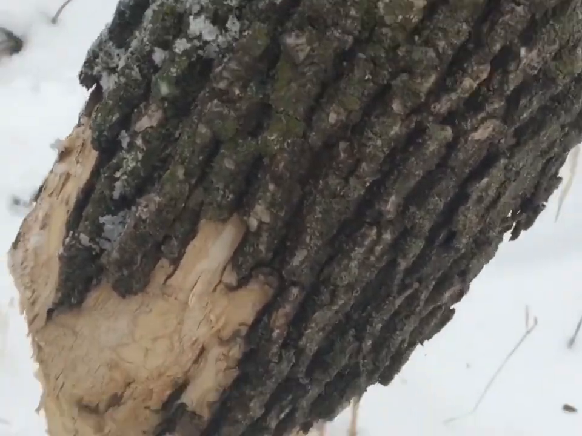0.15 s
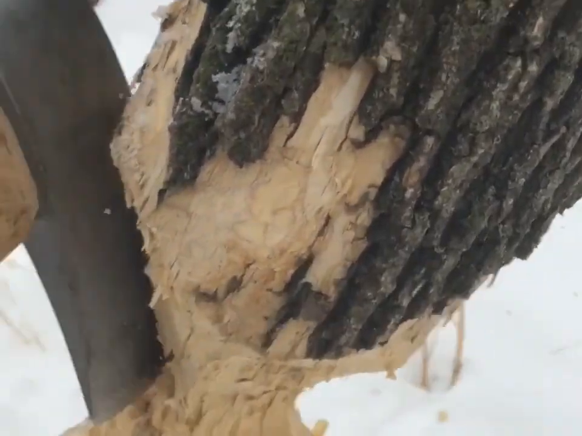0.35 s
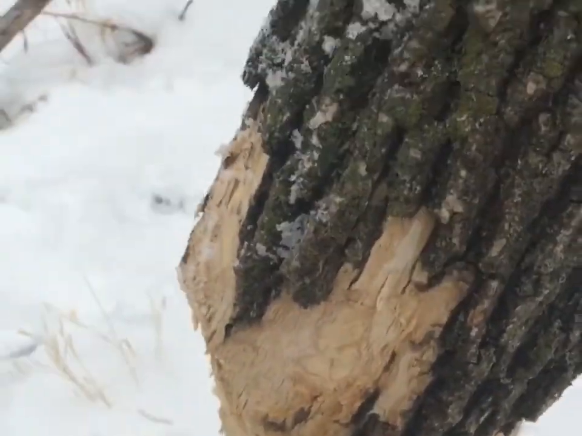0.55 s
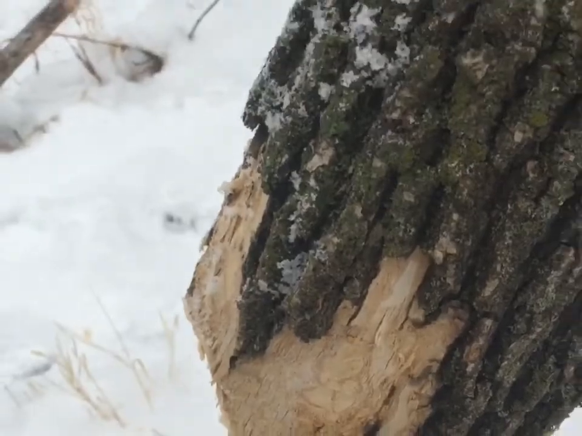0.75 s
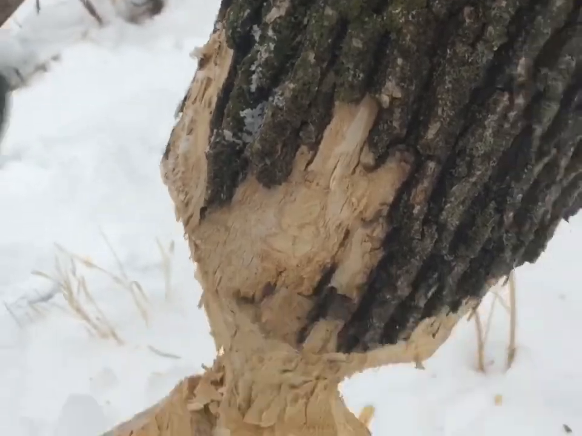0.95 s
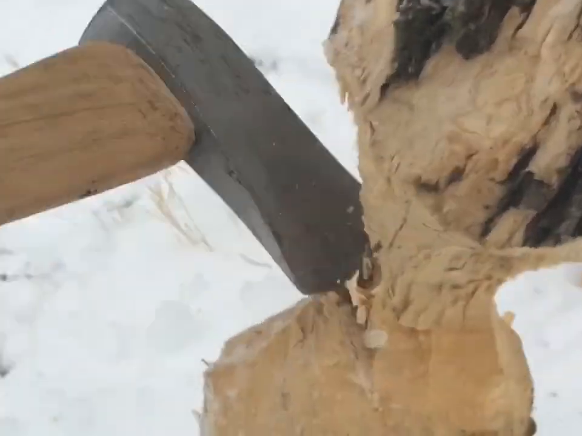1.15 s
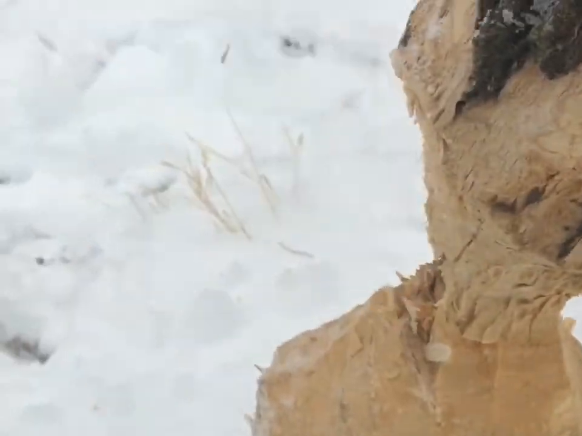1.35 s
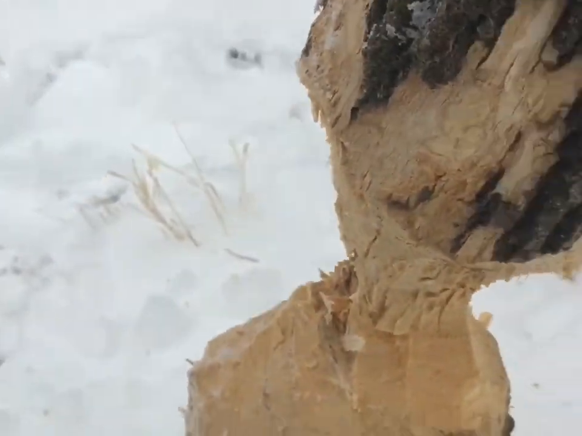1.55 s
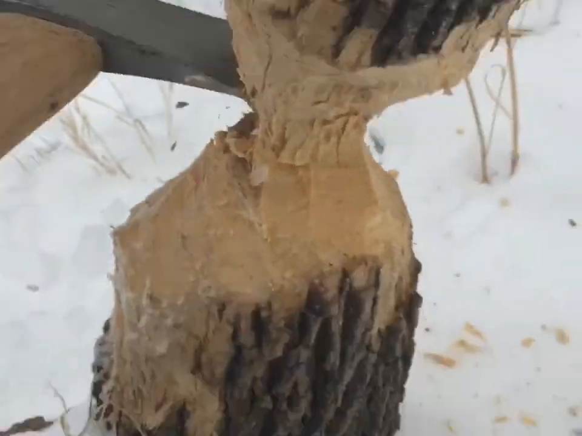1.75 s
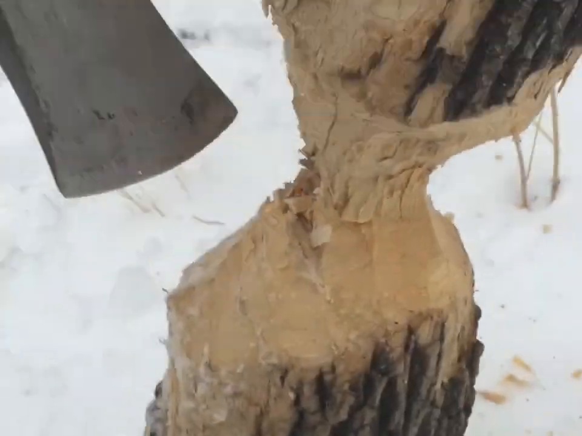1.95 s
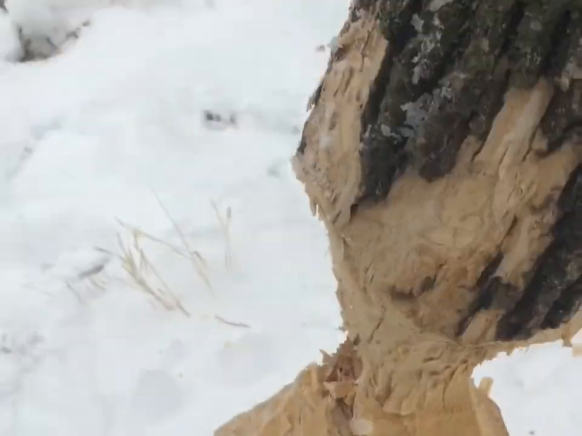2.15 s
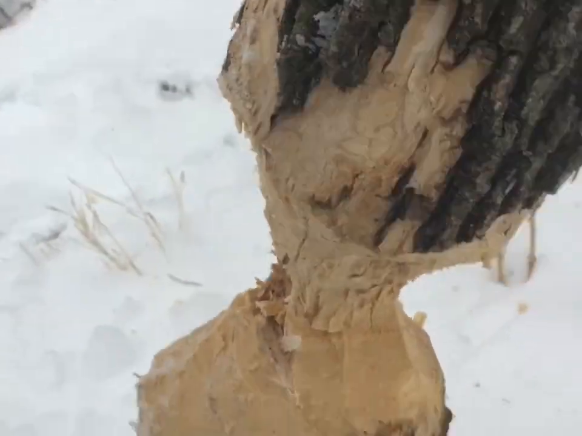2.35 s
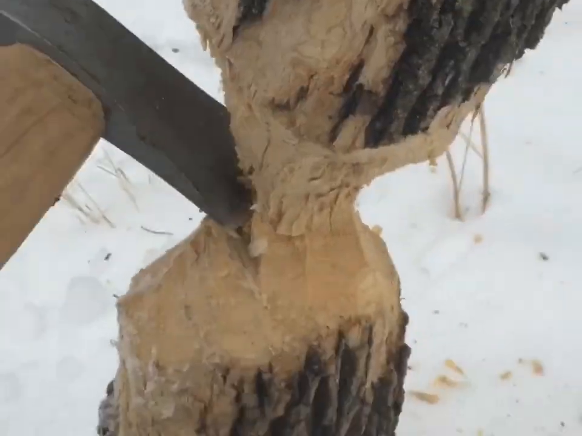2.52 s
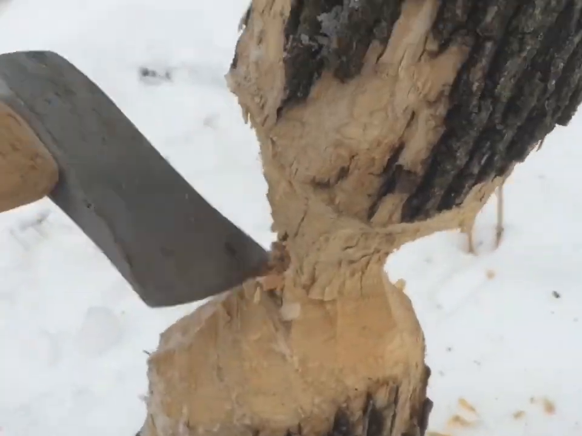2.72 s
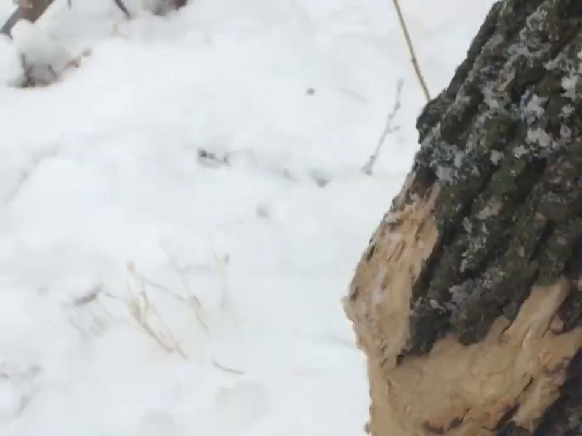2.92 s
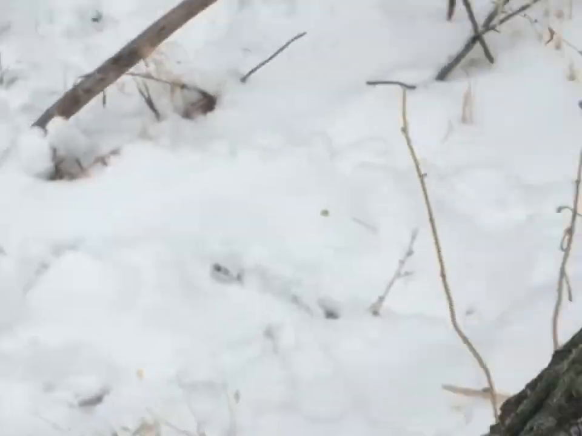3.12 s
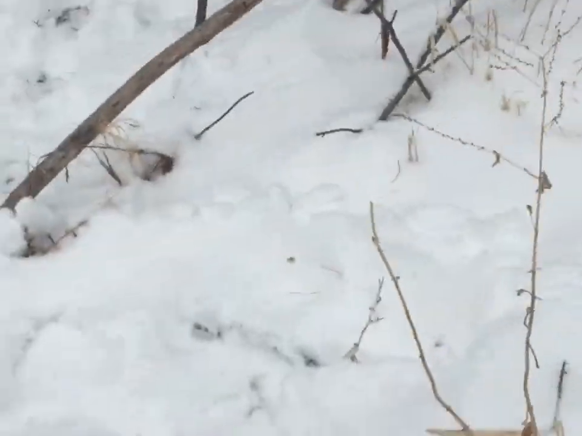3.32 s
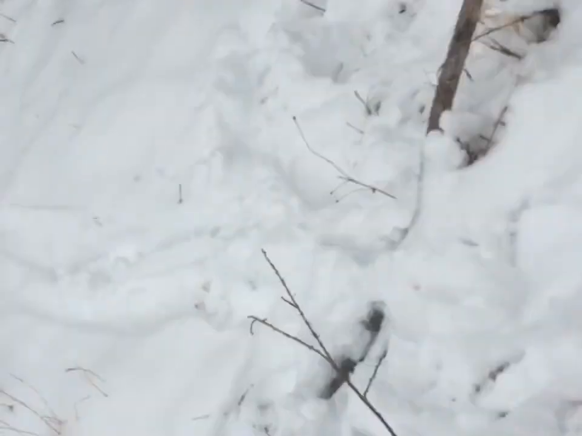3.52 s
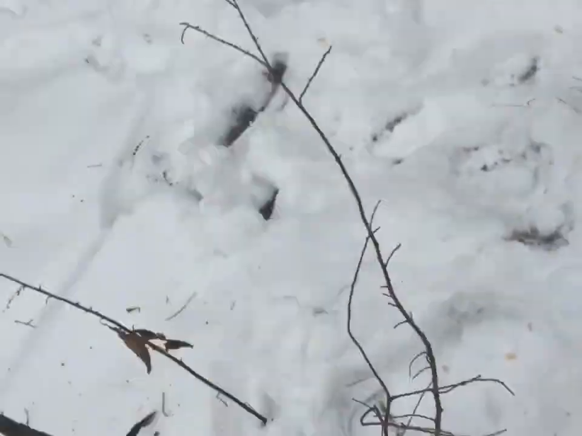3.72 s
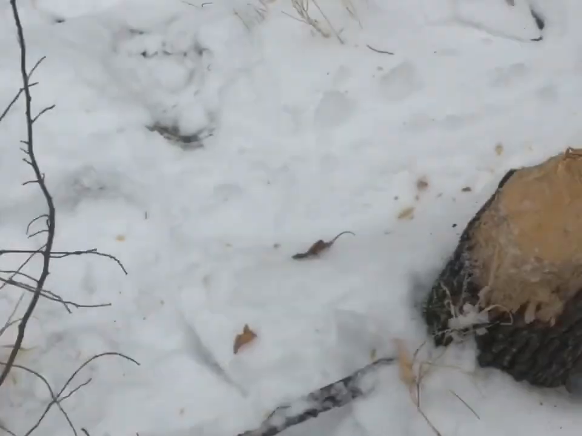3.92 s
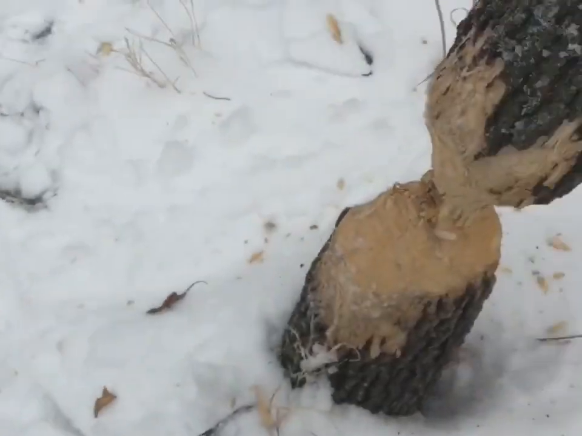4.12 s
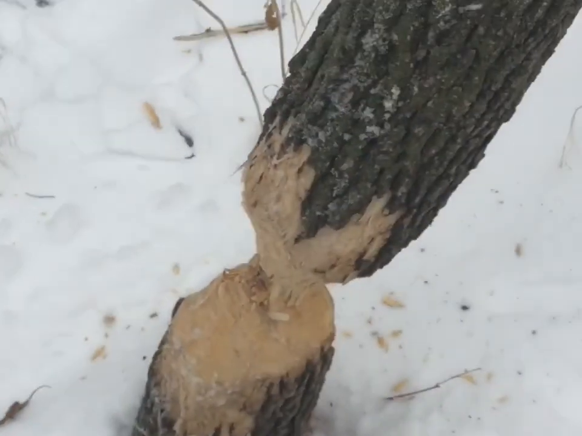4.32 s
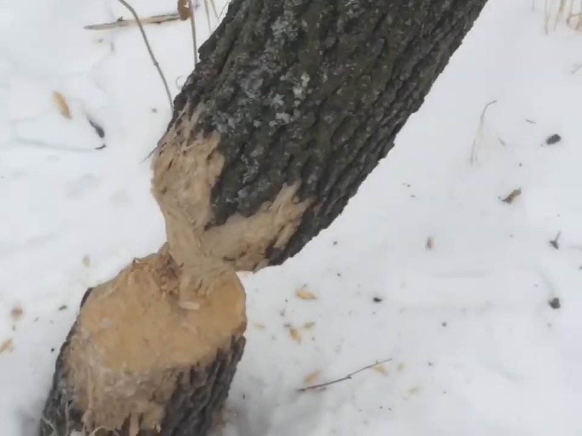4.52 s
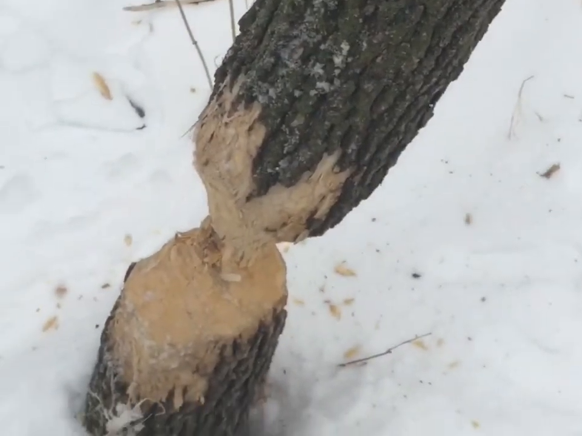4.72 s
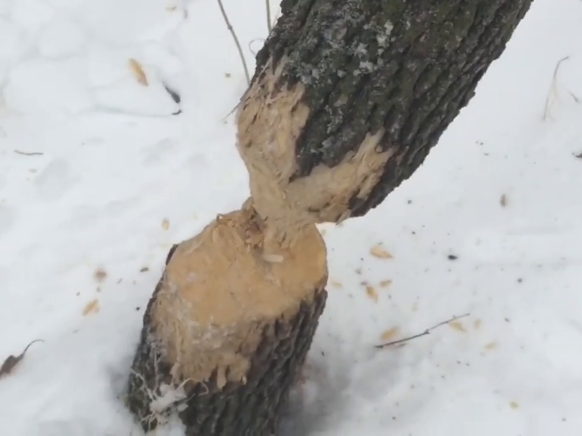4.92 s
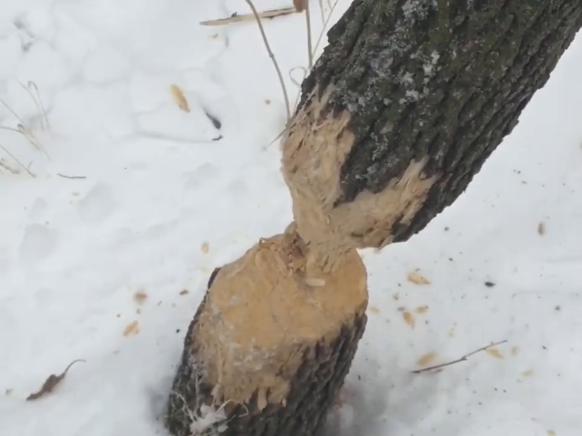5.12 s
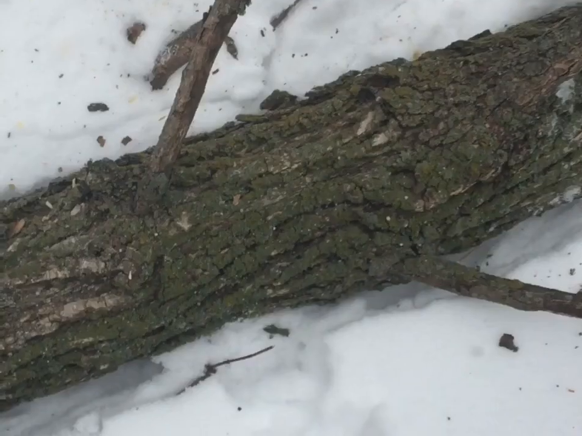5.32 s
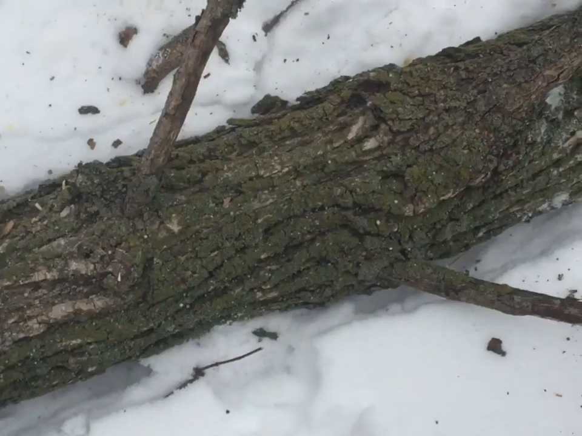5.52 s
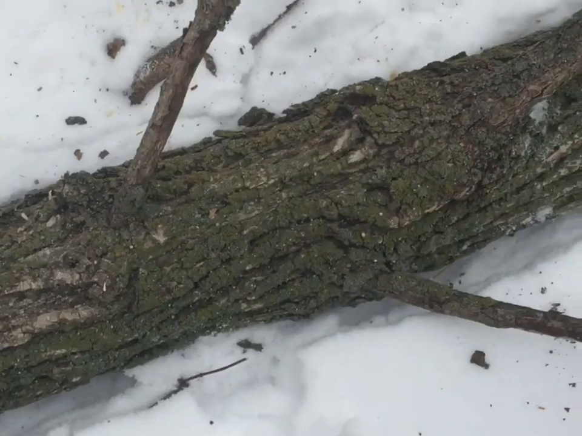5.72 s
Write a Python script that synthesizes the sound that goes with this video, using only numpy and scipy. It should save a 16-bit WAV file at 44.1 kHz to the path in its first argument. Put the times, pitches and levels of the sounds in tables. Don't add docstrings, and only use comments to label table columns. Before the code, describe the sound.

At arm's length, a hatchet hits a notched tree trunk four times, about three quarters of a second apart, each a hard woody crack and short hollow knock that overloads a hand-held phone. The third blow rings with steel. Between them come light blade taps, stiff jacket swishes and ticking chips. Then chopping stops, leaving soft snow crunches, cloth rustle and casing bumps in still, dry winter woods.

```python
import sys
import numpy as np
from scipy import signal
from scipy.fft import rfft, irfft
from scipy.io import wavfile
from scipy.ndimage import uniform_filter1d

SR = 44100
rng = np.random.default_rng(int(sys.argv[2]) if len(sys.argv) > 2 else 0)


def log_audio(samples):
    frames = np.atleast_2d(samples).T
    limited = np.clip(frames, -1, 1)
    pcm = np.round(limited * 32767).astype(np.int16)
    wavfile.write(sys.argv[1], SR, pcm)


def rack_gain(trim_db):
    fader = np.asarray(trim_db, float)
    return 10 ** (fader / 20)


N = 254016

# t/s, fibre crack level/dB, notch knock level/dB, knock f/Hz, steel ring level/dB
BLOWS = [
    (.3195, 0.5, 6, 1121, -39.5),
    (1.0715, 2.5, 3.5, 1050, -37),
    (1.7931, 6.5, 2.5, 777, -8),
    (2.5479, 3, 5, 1023, -42.5),
]
# crack lead before contact/ms, crack length/ms, mid level/dB,
# treble level/dB, knock delay after contact/ms
BITES = [
    (-.1, 1.6, -8, -17, .7),
    (.2, 1.8, -2, -17, 1.5),
    (.1, 1.8, -3, -2, 1.8),
    (.4, 1.9, -6, -17, .6),
]
# f/Hz, t60/s, arrival/ms, first swing (+-1), level/dB at each of the four blows
TRUNK_MODES = [(83, 0.13, 3.2, -1, -9.5, -6, -5.5, -10), (130, 0.031, 2.4, 1, 5, -11, 1.5, 3),
               (136.43, 0.11, 4.1, 1, -12, -2, -9, -9.5), (260, 0.082, 5.4, 1, -10, -2.5, -15, -9.5),
               (311.7, .09, 4.7, 1, -6, -2, -12.5, -7), (445, 0.045, 4.1, 1, -9.5, -4, -23, -13),
               (552, 0.029, 4.0, -1, -15.5, -7, -10, -6.5), (584, .1, 4.7, 1, -21, -18, -17.5, -17.5),
               (725, 0.025, 3.5, 1, -16, -8, -11, -16), (870, 0.025, 3.0, 1, -15, -9, -14, -12)]
# t/s, f/Hz, level/dB, t60/s
SLIVERS = [(.3212, 1850, -9, .025), (.3212, 2280, -8, .012), (.3215, 2800, -8, .015),
           (.3208, 3480, -7, .012), (.3208, 4120, -15, .014), (1.0725, 1680, -17, .02),
           (1.0725, 1990, -22, .02), (1.0725, 4400, -10, .012), (1.0722, 5300, -10, .006),
           (1.0725, 5910, -11, .01), (1.7945, 3550, -4, .014), (1.7943, 3850, -4, .02),
           (1.7945, 4185, -4, .02), (1.7945, 6200, -11, .012), (1.795, 7360, -13, .014),
           (1.795, 8590, -12, .014), (1.7955, 1040, -12, .025), (2.5487, 1400, -9, .016),
           (2.5487, 2290, -11, .016), (2.5485, 3560, -12, .016), (2.5487, 3855, -14, .014),
           (2.5487, 4295, -7, .014), (2.5487, 4700, -9, .012), (2.5487, 6020, -15, .012),
           (2.5487, 7140, -16, .01)]
# f/Hz, t60/s, level/dB
STEEL_MODES = [(3465, .066, -4), (3535, .03, -8), (4460, .028, 1), (4000, .02, -9), (7050, .02, -8),
               (2290, .02, -18), (8225, 0.034, -18.5), (11400, 0.04, -25), (12350, .04, -21)]
# t/s, tick level/dB, steel level/dB, upper steel modes level/dB, wood knock level/dB
REBOUNDS = [(.2975, -49, -56, -4, -28.5), (.3695, -19, -20, -4, -5), (1.193, -45, -62, 12.5, -65),
            (1.2105, -23, -21, 4, -23.5), (1.243, -60, -40, -6, -55), (1.836, -46, -51, 12, -47.5),
            (1.848, -35, -48, 4, -39), (1.864, -40, -51, 10, -47), (1.893, -55, -42, 6.5, -59),
            (2.527, -62, -53, -9, -32), (2.823, -59, -38.5, -4, -56), (2.886, -40, -50, 8, -44)]
# t/s, tick level/dB, wood knock level/dB, knock f/Hz
GRAZES = [(0.283, -53.5, -63.5, 1000), (.309, -53.5, -25, 1000), (.398, -45, -44, 2560),
          (1.014, -57, -33.5, 660), (1.052, -45, -48.5, 896), (1.114, -36.5, -41, 3000),
          (1.746, -60, -43, 924), (2.54, -55.5, -40.5, 900), (2.591, -42, -50.5, 2500),
          (2.722, -62.5, -42.5, 2300), (2.768, -46.5, -36, 590), (2.784, -57, -43.5, 1070),
          (2.896, -58.5, -33.5, 810), (3.354, -44, -25, 850)]
# start t/s, end t/s, level/dB
DRAGS = [(0, 0.02, -50), (0.35, 0.37, -38), (0.408, 0.462, -56), (1.062, 1.074, -52), (1.852, 1.928, -57),
         (1.94, 1.977, -56), (2.673, 2.748, -59), (2.746, 2.85, -54), (2.858, 2.9, -60)]
# t/s, tick peak level/dB, tick f/Hz, snap level/dB
TICKS = [(.207, -58, 1530, -72), (.523, -50, 417, -81.5), (.699, -41.5, 2790, -65.5),
         (.748, -51.5, 1483, -69.5), (1.296, -34, 2582, -58), (1.322, -32, 1840, -49),
         (1.353, -32, 620, -59), (1.385, -38.5, 705, -45), (1.397, -34, 2110, -42), (1.648, -44, 2540, -60),
         (1.977, -43, 422, -56.5), (2.115, -42, 3670, -64), (2.262, -51, 1550, -67.5),
         (2.315, -51.5, 823, -65.5), (2.485, -43, 700, -63), (2.936, -37.5, 390, -60),
         (2.96, -43, 1065, -63), (3.282, -40, 2230, -60.5), (3.429, -42, 408, -49),
         (3.445, -50, 401, -38.5), (3.575, -42, 550, -67), (3.759, -32.5, 540, -52), (3.78, -37, 563, -61),
         (3.813, -38.5, 418.4, -59), (3.865, -35, 423, -51), (3.937, -48, 394.6, -52),
         (4.429, -38, 1480, -66), (4.627, -37.5, 684, -58), (4.988, -37.5, 404, -59),
         (5.343, -45, 416, -75.5)]
# t/s, level/dB, f/Hz
FLICKS = [(1.354, -36, 1100), (1.432, -44, 1300), (1.514, -50, 2300), (1.649, -44, 1500),
          (1.893, -37, 2400), (1.93, -50, 6000), (1.964, -48, 3200), (2.027, -44, 900), (2.074, -44, 3800),
          (2.715, -52, 2300), (2.73, -52, 2300), (2.766, -40, 2500), (2.82, -42, 1800), (2.876, -44, 1000),
          (2.886, -40, 3900), (3.354, -33, 2000), (3.355, -37, 3300), (3.445, -40, 4200), (3.78, -37, 2200),
          (3.787, -45, 1200), (3.866, -42, 1500), (3.912, -43, 1300), (3.94, -42, 1400), (4.9, -54, 6500)]
# t/s, level/dB, f/Hz
BUMPS = [(0.08, -53.5, 71.71), (0.522, -54, 210), (1.215, -39.5, 62.79), (1.297, -57, 123),
         (1.321, -40.5, 365), (1.353, -37.5, 298.2), (1.384, -57, 153), (1.395, -58.5, 73),
         (1.647, -54.5, 275), (1.978, -39.5, 382), (2.117, -49, 71.8), (2.314, -49.5, 169),
         (2.436, -59.5, 335.4), (2.775, -43.5, 62), (2.936, -42.5, 187), (3.429, -44.5, 226),
         (3.461, -55.5, 71.8), (3.488, -43.5, 71), (3.572, -44.5, 107), (3.76, -44, 115.1),
         (3.782, -49, 108.3), (3.814, -43, 100), (3.911, -47, 334), (3.937, -38.5, 318.1),
         (4.219, -49.5, 109.2), (4.266, -53, 220), (4.303, -50, 70.95), (4.428, -49.5, 100),
         (4.627, -40, 159), (4.988, -40, 155)]
# start t/s, fastest t/s, end t/s, jacket swish level/dB, fine fabric hiss level/dB
STROKES = [(-.02, .01, .035, -57, -57.5), (.39, .45, .475, -63.5, -56.5), (.525, .55, .585, -50, -50.5),
           (.56, .65, .7, -65, -63), (.66, .705, .73, -60, -62), (1.268, 1.29, 1.35, -51, -60.5),
           (1.3, 1.38, 1.46, -51, -51), (1.42, 1.485, 1.505, -44.5, -47.5), (1.87, 1.9, 1.95, -54, -54),
           (1.96, 2.0, 2.05, -50, -54), (2.0, 2.04, 2.09, -48, -55), (2.762, 2.78, 2.83, -53, -58),
           (2.78, 2.82, 2.87, -48.5, -49), (2.83, 2.88, 2.99, -47.5, -49.5), (3.43, 3.452, 3.49, -62, -57),
           (3.56, 3.68, 3.74, -60, -67), (3.7, 3.756, 3.82, -48, -58), (3.82, 3.92, 4.02, -47, -50),
           (4.06, 4.19, 4.32, -57.5, -62.5), (4.21, 4.232, 4.25, -71, -48.5), (4.3, 4.43, 4.53, -64, -69.5),
           (4.89, 4.902, 4.915, -73, -67.5)]
# start t/s, heaviest t/s, end t/s, snow crunch level/dB, hand rumble level/dB
SHIFTS = [(-.02, .01, .04, -59, -59), (.5, .552, .74, -62.5, -55.5), (1.25, 1.37, 1.5, -53.5, -53.5),
          (1.95, 2.0, 2.1, -74, -64), (2.75, 2.88, 2.98, -54, -54), (3.38, 3.45, 3.55, -67.5, -52),
          (3.55, 3.76, 3.83, -53, -49), (3.8, 3.9, 4.03, -45.5, -51), (4.15, 4.22, 4.33, -62, -59),
          (4.38, 4.44, 4.5, -65, -62), (4.97, 4.995, 5.03, -67, -62)]
# t/s, restlessness level/dB
FIDGET = [
    (0, -72),
    (.8, -67.5),
    (2.3, -69),
    (3.1, -65),
    (4.3, -67.5),
    (4.6, -73),
    (5.2, -77.5),
    (5.76, -85),
]
# start t/s, end t/s, from f/Hz, to f/Hz, level/dB
SLIDES = [
    (3.29, 3.46, 2300, 2000, -64),
    (3.52, 3.76, 1800, 1550, -58),
    (1.455, 1.5, 1800, 3100, -45),
    (1.995, 2.055, 1600, 4000, -46),
    (.69, .72, 2100, 2900, -53),
    (4.12, 4.24, 3200, 3900, -65),
]
# f/Hz, level/dB per Hz
SWISH_SPECTRUM = [(710, -35.5), (1200, -7), (1510, -5.5), (2060, 0), (3010, -4), (4000, -3.5), (4860, -12),
                  (6440, -11), (7490, -16), (8910, -11.5), (10500, -19.5), (13900, -16), (16000, -24)]
# f/Hz, level/dB per Hz
WOODS_SPECTRUM = [(15, -47), (25, -12.5), (65, -0.5), (92, -15.5), (389, -20), (483, -24), (11600, -35),
                  (16500, -46.5)]

WOODS_DB = -65.5
MIC_LOW_HZ, MIC_TOP_HZ = 66, 16300
REBOUND_KNOCK_HZ = 1000
GRAZE_STEEL_DB = -27
GRIP_S = 0.0034
IDLE_HISS_DB, IDLE_CRUNCH_DB, IDLE_RUMBLE_DB = -5.5, 0.5, 1
SWING_S, SWING_DB, SWING_HISS_DB = 0.11, -57.5, -56.5
JOLT_S, JOLT_FADE_S, JOLT_CRUNCH_DB, JOLT_RUMBLE_DB = 0.036, 0.083, -46, -34.5
SWAY_S, SWAY_CRUNCH_DB, SWAY_RUMBLE_DB = 0.288, -64, -48.5
EDGE_DB, ROUNDNESS, STOP_DB_PER_S = 12, 1.5, 499
GRAIN = 64


def unit(x):
    return x / np.sqrt(np.mean(x ** 2))


def add(out, s, sound):
    i = int(s * SR)
    out[i:i + len(sound)] += sound[:len(out) - i]


def ring(hz, t60, rise_ms):
    t = np.arange(int(0.91 * t60 * SR) + 64) / SR
    return np.sin(2 * np.pi * hz * t) * rack_gain(-60 * t / t60) * (1 - np.exp(-t * 1000 / rise_ms))


def coloured(points, size, lo_hz=0, hi_hz=1e5):
    f = np.fft.rfftfreq(size, 1 / SR) + 1
    points_hz, points_db = np.transpose(points)
    db = np.interp(np.log(f), np.log(points_hz), points_db)
    edges = 1 / (1 + (lo_hz / f) ** 6) / (1 + (f / hi_hz) ** 6)
    return unit(irfft(rfft(rng.standard_normal(size)) * rack_gain(db) * edges, size))


def walk(rate):
    hold = int(SR / rate)
    return uniform_filter1d(rng.standard_normal(N)[np.arange(N) // hold], hold)


def chops():
    out = np.zeros(N)
    t = np.arange(SR // 2) / SR
    for k, (s, crack_db, knock_db, knock_hz, steel_db) in enumerate(BLOWS):
        lead_ms, length_ms, mid_db, treble_db, knock_ms = BITES[k]
        add(out, s - lead_ms / 1000, rack_gain(crack_db - 5.5) * crack(length_ms, treble_db, mid_db))
        seat = s + knock_ms / 1000
        add(out, seat, rack_gain(knock_db + 1.5) * ring(knock_hz, 0.018, rise_ms=0.3))
        add(out, seat + 0.0015, rack_gain(knock_db - 16.5) * ring(0.72 * knock_hz, 0.024, rise_ms=0.4))
        add(out, seat + 0.0004, rack_gain(knock_db - 24.5) * ring(1.9 * knock_hz, 0.023, rise_ms=1.0))
        steel(out, s + 0.003, steel_db, upper_db=-18)
        for hz, t60, arrival_ms, swing, *mode_db in TRUNK_MODES:
            add(out, s + arrival_ms / 1000, np.sign(swing) * rack_gain(mode_db[k]) * ring(hz, t60, rise_ms=1.2))
        limbs = [(50, -5.5), (120, 2), (400, -5.5), (700, -7), (1100, -16), (2500, -34.5)]
        decay = rack_gain(-22 - 60 * t / 0.16) + rack_gain(-40.5 - 60 * t / 0.5)
        add(out, s + 0.0033, coloured(limbs, len(t)) * decay * (1 - np.exp(-t / 0.003)))
    for s, hz, db, t60 in SLIVERS:
        add(out, s, rack_gain(db) * ring(hz, t60, rise_ms=0.4))
    return out


def crack(length_ms, treble_db, mid_db=4):
    size = 4096
    t = np.arange(size) / SR * 1000 / length_ms
    bright = coloured([(300, -12.5), (1500, -8.5), (3000, mid_db - 3), (5500, mid_db), (16000, treble_db)], size)
    dull = coloured([(300, -6), (1500, 0), (4500, -3), (8000, -21), (16000, -40)], size)
    snap = t ** 6 * np.exp(7 - 7.01 * t)
    swell = 0.2 * np.sqrt(t) * (t < 1)
    collapse = 0.12 * np.exp(1 - t / 1.5) * (t >= 1)
    uneven = rack_gain(4 * np.repeat(rng.standard_normal(64), 64))
    splinters = uneven * (rack_gain(-8.5) * np.exp(-t / 1.8) + rack_gain(-43) * np.exp(-t / 12))
    return bright * (snap + swell + collapse) + dull * splinters * np.minimum(t, 1)


def steel(out, s, db, upper_db):
    for hz, t60, mode_db in STEEL_MODES:
        contact_db = 0
        if abs(hz - 3500) > 200:
            contact_db = upper_db + 2.5 * rng.standard_normal()
        add(out, s, rack_gain(db + mode_db + contact_db) * ring(hz, t60, rise_ms=0.9))


def rebounds():
    out = np.zeros(N)
    touches = [(*row, REBOUND_KNOCK_HZ) for row in REBOUNDS]
    touches += [(s, db, db + GRAZE_STEEL_DB, 0, *knock) for s, db, *knock in GRAZES]
    for s, tick_db, steel_db, upper_db, knock_db, knock_hz in touches:
        add(out, s - 0.001, rack_gain(tick_db) * crack(0.8, treble_db=-18))
        add(out, s + 0.00073, rack_gain(knock_db) * ring(knock_hz, 0.0078, rise_ms=0.088))
        add(out, s + 0.0012, rack_gain(knock_db - 8) * ring(0.73 * knock_hz, 0.02, rise_ms=0.5))
        add(out, s + 0.0022, rack_gain(knock_db - 15) * ring(0.33 * knock_hz, 0.05, rise_ms=0.93))
        add(out, s + 0.00016, rack_gain(knock_db - 7) * ring(1.6 * knock_hz, 0.007, rise_ms=0.3))
        head = np.zeros(SR // 8)
        steel(head, 0, steel_db, upper_db)
        free_s = min([row[0] - s for row in touches if row[0] > s] + [1])
        choked_s = np.maximum(np.arange(len(head)) / SR - free_s, 0)
        add(out, s + 0.00045, head * np.exp(-choked_s / GRIP_S))
    return out


def drags():
    t, push = np.arange(N) / SR, np.zeros(N)
    for start, end, db in DRAGS:
        push += rack_gain(db) * np.clip(np.minimum(t - start, end - t) / 0.012, 0, 1)
    head = np.zeros(SR // 8)
    steel(head, 0, 0, upper_db=-4)
    add(head, 0, rack_gain(-11) * ring(2290, 0.04, rise_ms=0.5))
    add(head, 0, rack_gain(-19) * ring(7010, 0.06, rise_ms=0.5))
    add(head, 0, rack_gain(-27) * ring(12350, 0.08, rise_ms=0.5))
    head = head * np.exp(-np.arange(len(head)) / SR / 0.018)
    scratches = rng.standard_normal(N) * rack_gain(3.5 * walk(110))
    return push * unit(signal.fftconvolve(scratches, head)[:N])


def ticks():
    out = np.zeros(N)
    for s, tick_db, tick_hz, snap_db in TICKS:
        add(out, s, rack_gain(tick_db - 0.5) * ring(tick_hz, 0.0099 + 3.3 / tick_hz, rise_ms=0.12))
        add(out, s, rack_gain(snap_db + 2.5) * crack(0.44, treble_db=-21))
    for s, db, hz in FLICKS:
        low = ring(hz, 0.006, rise_ms=0.06)[:256]
        high = ring(1.43 * hz, 0.006, rise_ms=0.06)[:256]
        add(out, s, rack_gain(db) * (low + 0.6 * high))
    return out


def bumps():
    out = np.zeros(N)
    for s, db, hz in BUMPS:
        add(out, s + 0.0013, -rack_gain(db + 10.5) * ring(hz, 5.123 / hz, rise_ms=0.53))
    return out


def movement():
    swish_db, hiss_db, crunch_db, rumble_db = motion()
    slips = walk(70)
    cloth = fabric(swish_db, hiss_db, slips) + squeaks(swish_db) + crackle(swish_db)
    crunch = coloured([(300, -0.5), (700, -4.5), (1500, -4.5)], N, 220, 1200)
    crunch *= rack_gain(crunch_db - 2.5 + 0.94 * slips + 4.2 * walk(57))
    rumble = coloured([(35, 0), (70, 0), (150, -3), (300, -8)], N, 40, 330)
    rumble *= rack_gain(rumble_db + 2 + 2.5 * walk(22))
    return cloth + crunch + rumble


def fabric(swish_db, hiss_db, slips):
    out = np.zeros(N)
    weave_hz, weave_level_db = np.transpose(SWISH_SPECTRUM)
    for lo_hz in 1300 * 2 ** np.arange(0, 3.5, 0.25):
        fine = np.clip(np.log2(lo_hz / 3000) / 1.2, 0, 1)
        near_db = (1 - fine) * (swish_db - 5.5) + fine * (hiss_db + 4)
        weave_db = np.interp(np.log(lo_hz * 1.09), np.log(weave_hz), weave_level_db)
        width_db = 10 * np.log10(lo_hz / 3000)
        patches_db = 3.8 * walk(30) * min(5000 / lo_hz, 1) - 3
        band = coloured(SWISH_SPECTRUM, N, lo_hz, lo_hz * 1.1 if lo_hz < 12000 else MIC_TOP_HZ)
        out += band * rack_gain(near_db + weave_db + width_db + 2.6 * slips + patches_db)
    return out


def squeaks(swish_db):
    out = np.zeros(N)
    for when, pitch, size, glide in rng.random((600, 4)):
        hz = 1500 * 2 ** (1.7 * pitch)
        t = np.arange(int(SR * 24 / hz)) / SR
        chirp = np.sin(2 * np.pi * hz * t * (1 + 9 * (glide - 0.4) * t)) * np.hanning(len(t))
        add(out, when * N / SR, chirp * rack_gain(-2.5 * np.log(size + 0.03)))
    return out * rack_gain(swish_db - 4)


def crackle(swish_db):
    pops = (rng.random(N) < 420 / SR) * rack_gain(np.minimum(5 * rng.exponential(size=N), 10))
    body = ring(1500, 0.004, rise_ms=0.05)[:128]
    edge = np.pad(ring(4200, 0.0015, rise_ms=0.03), (0, 128))[:128]
    return unit(signal.fftconvolve(pops, body + edge)[:N]) * rack_gain(swish_db - 5)


def motion():
    blows = [row[0] for row in BLOWS]
    swings = [(s - SWING_S, s, s + 0.017, SWING_DB, SWING_HISS_DB) for s in blows]
    jolts = [(s + 0.0099, s + JOLT_S, s + JOLT_S + JOLT_FADE_S, JOLT_CRUNCH_DB, JOLT_RUMBLE_DB) for s in blows]
    sways = [(s + 0.05, s + 0.12, s + SWAY_S, SWAY_CRUNCH_DB, SWAY_RUMBLE_DB) for s in blows]
    gestures = np.concatenate([swells(list(STROKES) + swings), swells(list(SHIFTS) + jolts + sways)])
    idle_db = np.interp(np.arange(N) / SR, *np.transpose(FIDGET))
    idle_db = idle_db + np.array([[0], [IDLE_HISS_DB], [IDLE_CRUNCH_DB], [IDLE_RUMBLE_DB]])
    return 10 * np.log10(uniform_filter1d(gestures, GRAIN) + rack_gain(idle_db) ** 2)


def swells(rows):
    t, power = np.arange(0, N, GRAIN) / SR, 1e-12
    for start, top, end, *db in rows:
        away = np.where(t < top, (top - t) / (top - start), (t - top) / (end - top))
        outside_s = np.maximum(np.maximum(start - t, t - end), 0)
        fade_db = EDGE_DB * away ** ROUNDNESS + STOP_DB_PER_S * outside_s
        power = power + rack_gain(np.array(db)[:, None] - fade_db) ** 2
    return np.repeat(power, GRAIN, axis=1)[:, :N]


def slides():
    t, out = np.arange(N) / SR, np.zeros(N)
    for start, end, from_hz, to_hz, db in SLIDES:
        hz = np.interp(t, [start, end], [from_hz, to_hz]) * (1 + 0.04 * walk(40))
        gate = np.clip(np.minimum(t - start, end - t) / 0.0095, 0, 1)
        out += rack_gain(db) * gate * walk(320) * np.sin(2 * np.pi * np.cumsum(hz) / SR)
    return out


def woods():
    return coloured(WOODS_SPECTRUM, N) * rack_gain(WOODS_DB - 3.5 + 0.78 * walk(4))


def scene():
    tool = chops() + rebounds() + drags()
    near = ticks() + bumps() + movement() + slides()
    return (tool + near + woods())[None]


def band_limit(x):
    return signal.sosfilt(signal.butter(12, 17090, fs=SR, output="sos"), x)


def record(dry):
    heard = signal.sosfilt(signal.butter(2, MIC_LOW_HZ, "high", fs=SR, output="sos"), dry)
    clipped = 1.06 * heard / (1 + np.abs(heard) ** 10.5) ** (1 / 10.5)
    top_cut = signal.ellip(8, 0.2, 45, MIC_TOP_HZ, fs=SR, output="sos")
    return band_limit(np.clip(signal.sosfilt(top_cut, clipped), -1, 1))


dry = scene()
out = record(dry)
log_audio(out)
```